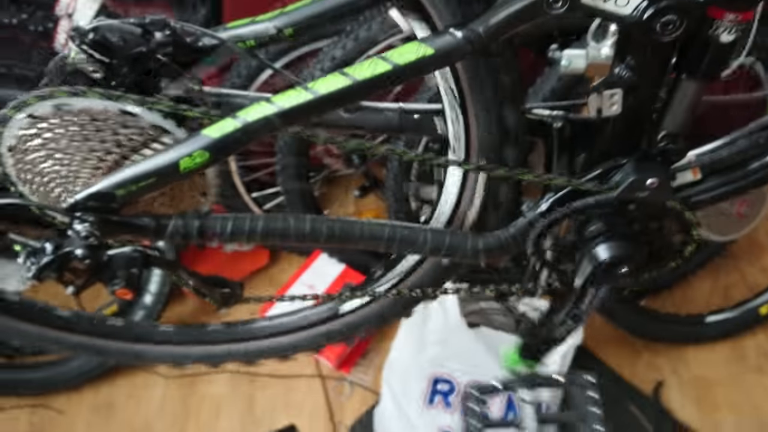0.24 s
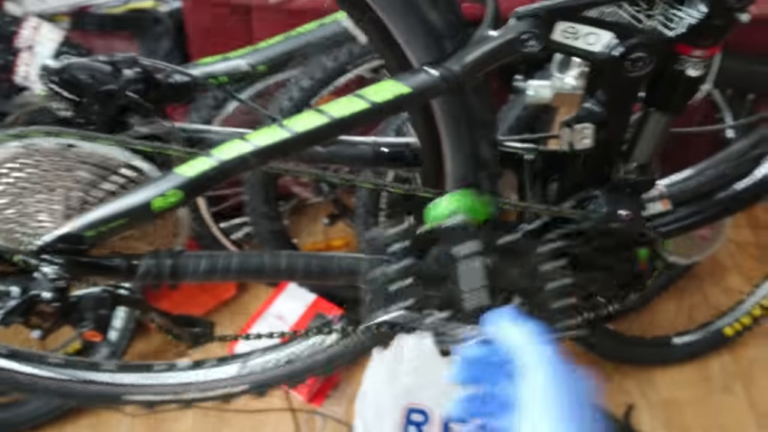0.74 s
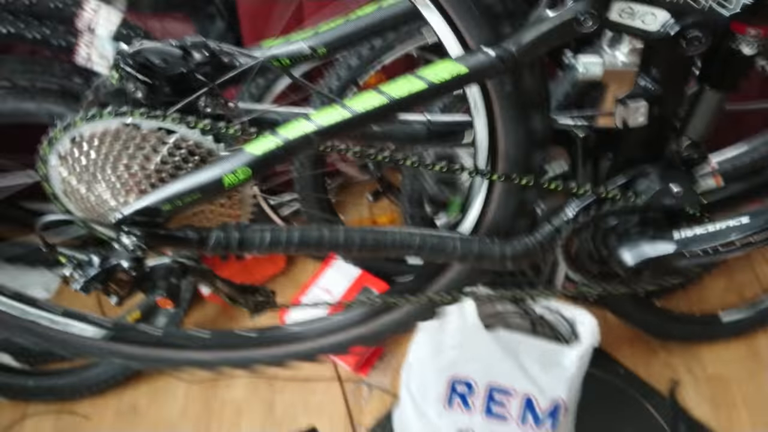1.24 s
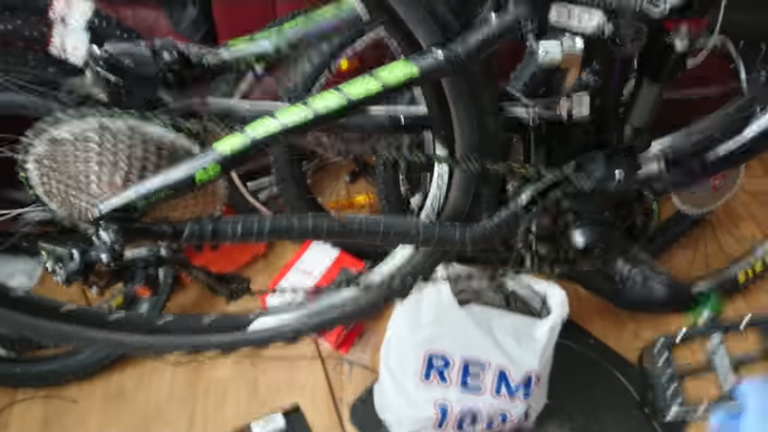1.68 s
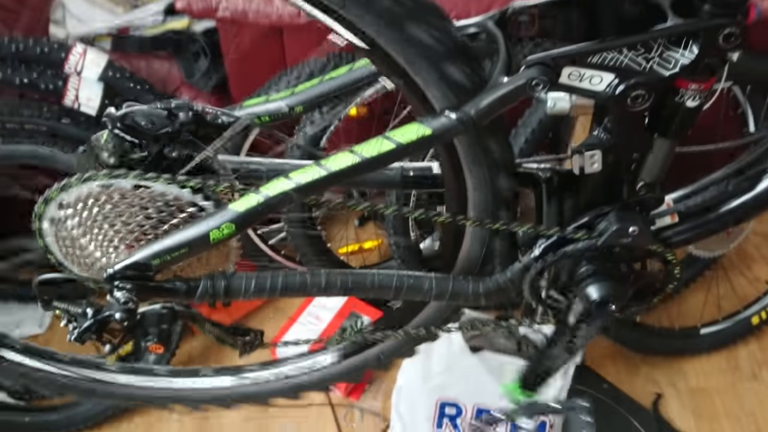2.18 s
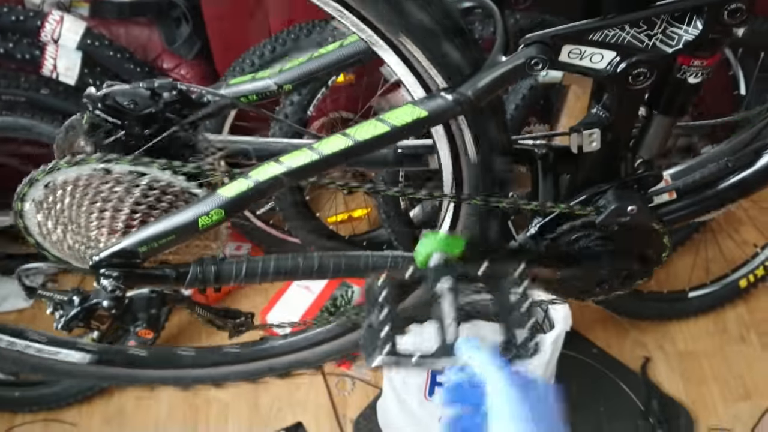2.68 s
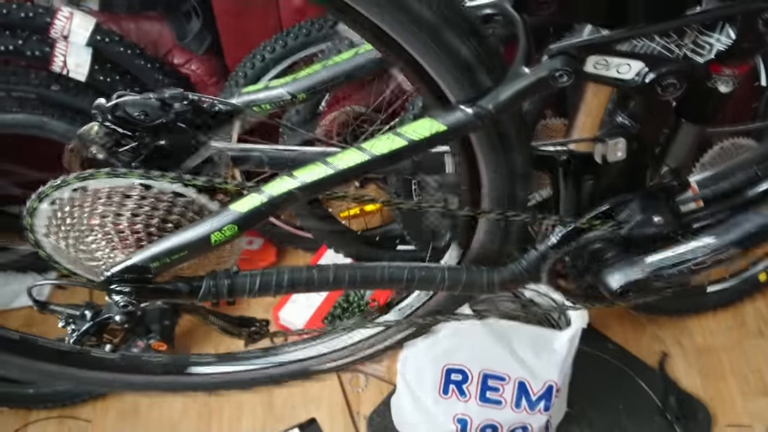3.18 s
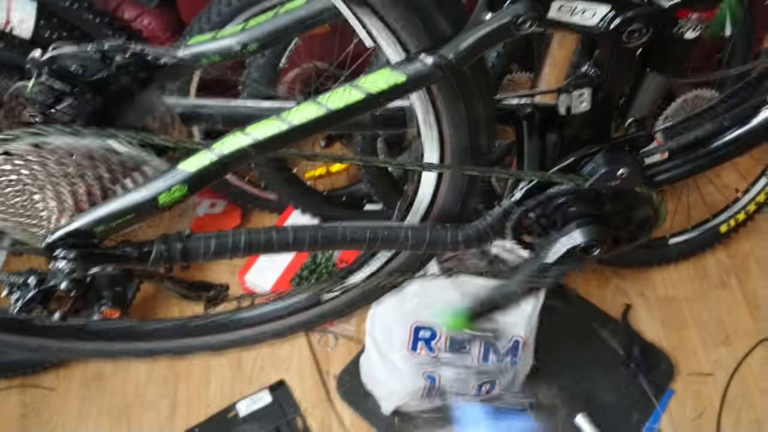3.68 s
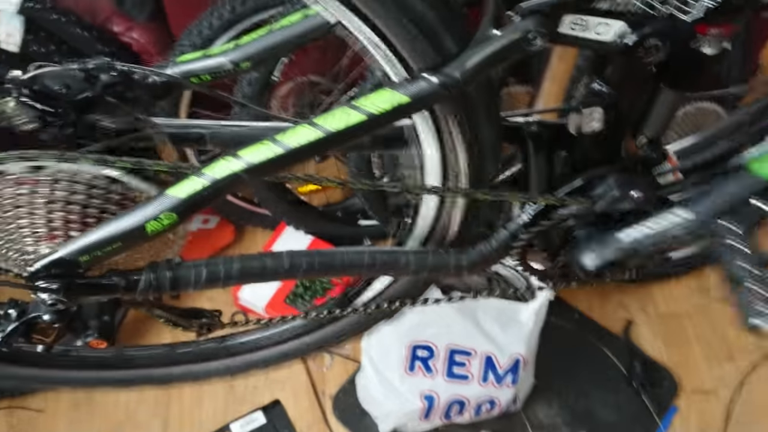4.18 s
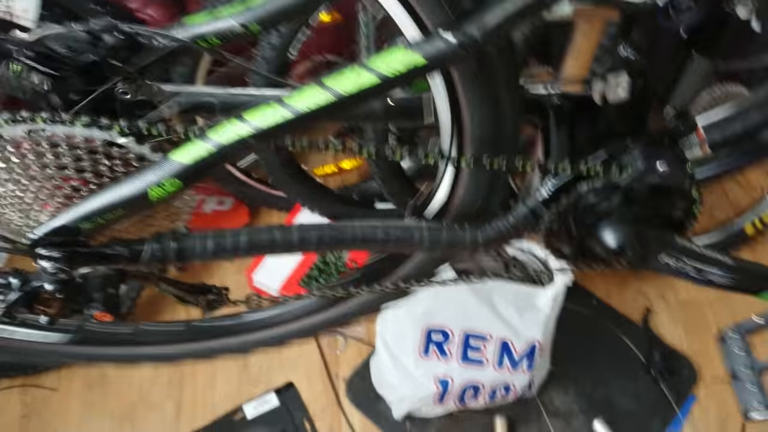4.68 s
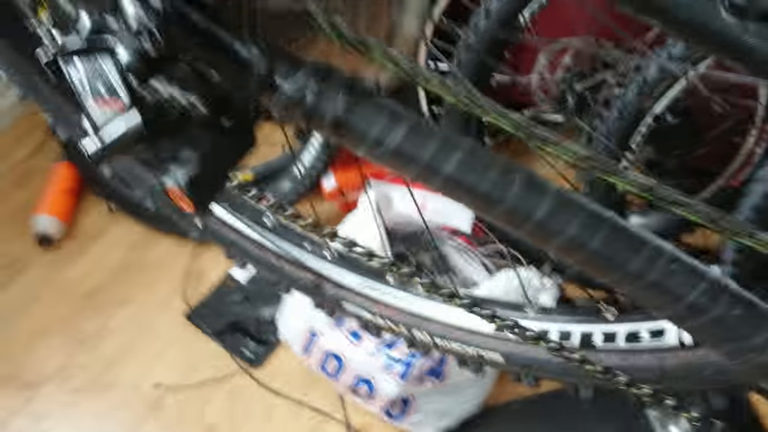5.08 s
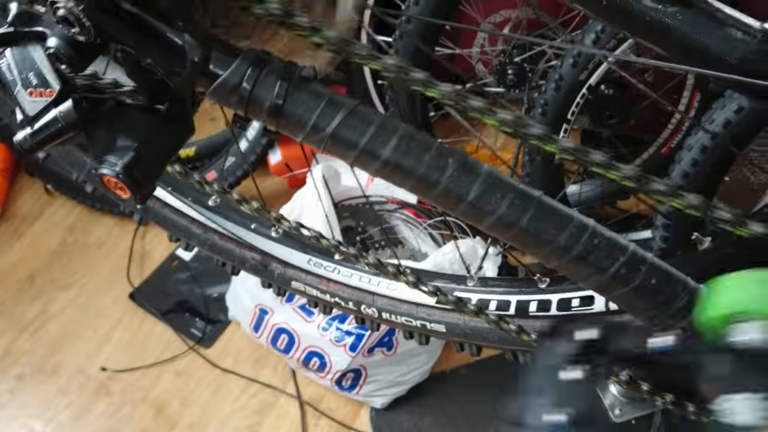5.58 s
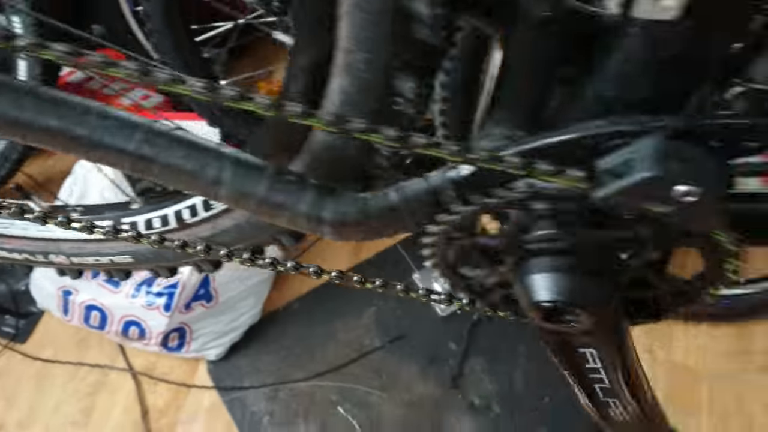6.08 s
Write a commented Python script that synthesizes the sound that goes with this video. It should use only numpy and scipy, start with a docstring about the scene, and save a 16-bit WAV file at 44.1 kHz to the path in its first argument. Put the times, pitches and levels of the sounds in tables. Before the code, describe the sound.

Hand-turned bicycle pedals drive a crunching chain, followed by slow freewheel clicks and the fast metallic buzz of a spinning wheel.

```python
"""A dry bicycle chain, cranked by hand in a small workshop, ticks and grinds over the cassette,
faster and faster. The crank stops and the freewheel ratchets slowly; the sound drops out briefly
with a click. Then the wheel is spun hard and, heard from closer, the pawl drops merge into a rasping
buzz that rings the hub. The frame rumbles and knocks under it, over faint room noise."""
import sys
import numpy as np
from scipy import signal
from scipy.fft import rfft, irfft
from scipy.io import wavfile

SR = 44100
rng = np.random.default_rng(int(sys.argv[2]) if len(sys.argv) > 2 else 0)


def to_wav(sig):
    """Store sig (one row per channel, or 1-D mono) as 16-bit WAV at the path in sys.argv[1].

    Samples outside -1..1 are clipped; the rate is SR.
    """
    pcm = np.clip(np.atleast_2d(sig), -1, 1) * 32767
    pcm = np.round(pcm).astype(np.int16)
    wavfile.write(sys.argv[1], SR, pcm.T)  # frames by channels


N = 279594
TIME = np.arange(N) / SR
CRANK_STOP_S = 3.99
EASY_LINK_HZ, FAST_TOOTH_HZ = 20, 100  # reference rates; each rise_db is per doubling of rate

# hand-cranked chain speed: time_s, link_rate_hz
CHAIN_SPEED = [(0.0538, 14.91), (0.17, 14.3), (0.29, 18.77), (0.53, 24.38), (0.65, 18.95), (0.77, 19.38),
               (0.9, 17.73), (1.02, 19.38), (1.62, 17.1), (1.74, 13.31), (1.98, 12.83), (2.34, 17.96),
               (2.46, 18.68), (2.58, 15.43), (3.06, 20.29), (3.3, 25.88), (3.54, 38.31), (3.9, 45.3),
               (4.02, 29.35)]
# spinning freewheel speed: time_s, tooth_rate_hz
SPIN_SPEED = [(4.911, 18.65), (4.97, 56.44), (5.05, 84.99), (5.12, 115.68), (5.2, 157.17), (5.28, 159.44),
              (5.35, 160.02), (5.41, 137.95), (5.5, 136.56), (5.62, 128.58), (5.76, 127.63), (5.87, 109.01),
              (5.97, 106.27), (6.07, 97.84), (6.16, 102.26), (6.25, 95.95), (6.34, 109.7)]


def chain():
    """Links hit the teeth, ring plates, clunk against the chain stay, and rattle over the derailleur pulleys."""
    # chain spectrum: freq_hz, left_db, right_db
    spectrum = [(300.0, -26, -10.5), (1250, -14.5, -18), (2100, -9.5, -13.5), (2910, -9, -10.5),
                (4320, -2, -8.5), (5030, -4, -8.5), (7280, -12, -28), (7830, -21.5, -23.5),
                (9370, -15, -5.5), (10570, -16.5, -16), (11540, -50, -24), (13100, -21, -17.5),
                (13700, -15, -22), (15300, -19.5, -15)]
    contacts = [(-.002, -14, .0013), (.0009, -1, .00052)]  # delay_s, level_db, decay_s
    start_s, level_db, crack_db = links()
    plates = band(strokes(start_s, undb(level_db + 14.5), contacts), 3755, 4840)
    stay_clunk = band(strokes(start_s, undb(level_db + 13.5), contacts), 2200, 2210)
    cracks = impacts(start_s, undb(level_db + crack_db), contacts, scatter_db=5, jitter_s=.0001)
    rattle_s = start_s + .009 * rng.standard_normal(len(start_s))
    rattles = impacts(rattle_s, undb(level_db - 7), contacts, scatter_db=2.1, jitter_s=.00039)
    sound = colour(cracks + plates + stay_clunk + lowpass(rattles, 7500) + rollers(), spectrum)
    return workshop(sound, early_db=-5, early_t60_s=.059, late_db=-5.5, late_t60_s=.21)


def links(rise_db=7.5, scatter_db=2.5):
    """One tick per link, harder at speed; stiff links snap. Returns start_s, level_db, crack_db."""
    # stiff links catching and snapping free: start_s, level_db, crack_over_level_db
    snaps = [(0.272, -40.5, 12), (0.4045, -32.5, 6.5), (0.496, -27.5, 1), (0.5744, -33, 9), (.6769, -35, 2),
             (.8917, -35.5, -1), (0.922, -41, 14), (0.997, -25, 0.5), (1.1336, -35, 10.5),
             (1.3187, -36.5, 5.5), (1.6584, -41.5, 12.5), (1.6876, -35.5, 14.5), (1.956, -39, 3.5),
             (2.1024, -37, 5), (2.458, -38, 13), (2.974, -33.5, 2), (3.028, -34, 6.5), (3.123, -38, 11),
             (3.4887, -26, 4.5), (3.693, -26.5, 8), (3.7172, -28.5, 5), (3.7413, -25.5, 2),
             (3.901, -24, -3), (4.0055, -22.5, 4)]
    start_s, rate_hz = passing(CHAIN_SPEED)
    chance = rng.standard_normal((len(start_s), 2))
    level_db = -40 + rise_db * np.log2(rate_hz / EASY_LINK_HZ) + scatter_db * chance[:, 0]
    crack_db = 5.5 + 2 * chance[:, 1]
    ticks = np.column_stack([start_s, level_db, crack_db])
    supple = np.abs(start_s[:, None] - np.array(snaps)[:, 0]).min(1) > .01
    return np.vstack([ticks[supple], snaps]).T


def rollers(grain_rate_hz=4000):
    """Dry rollers crunch, louder and brighter with speed and effort; they fade as the crank stops."""
    grains = rng.standard_normal((2, N)) * (rng.random(N) < grain_rate_hz / SR)
    grains *= undb(2.7 * np.minimum(rng.exponential(size=N), 4))
    drive_db = cranking_db(rise_db=8.5)
    dull = lowpass(grains, 10000)
    grind = unit(dull + (grains - dull) * undb(.52 * drive_db - 2.5))
    turning = np.interp(TIME, [CRANK_STOP_S - .05, CRANK_STOP_S + .51], [1, 0])
    return grind * undb(-62 + drive_db) * turning


def cranking_db(rise_db):
    """Level change of drive noise with chain speed and hand effort."""
    # push of the hand on the pedal: time_s, effort_db
    effort = [(0, 1.5), (.25, -3.5), (.5, 2.5), (.8, -.5), (1.2, 1.5), (2.0, -4), (2.42, -2.5), (2.8, -2),
              (3.7, 1.5), (4.02, 4)]
    return rise_db * np.log2(curve(CHAIN_SPEED) / EASY_LINK_HZ) + curve(effort)


def spinning(rise_db=3):
    """Freewheel spun up: pawl drops grow harder, merge into a buzz and ring hub and pawls."""
    # buzz spectrum: freq_hz, left_db, right_db
    spectrum = [(145, -43, -42.5), (1220, -31.5, -31), (1740, -24, -22), (2010, -21, -13.5),
                (2320, -32, -18), (2760, -12.5, -4.5), (3720, -12, -12), (4300, -12, -8),
                (6750, -15, -17.5), (7680, -19, -27), (9130, -21, -10), (11900, -25.5, -29.5),
                (13300, -23.5, -17.5), (15400, -9.5, -17)]
    # pawl contacts: delay_s, level_db, decay_s
    pawls = [(-.0015, -9, .00029), (-.0006, -6, .00023), (.0002, -9.5, .0008)]
    start_s, rate_hz = passing(SPIN_SPEED)
    chance = rng.standard_normal((len(start_s), 2))
    start_s = start_s + .00004 * chance[:, 1]
    gains = undb(1.48 + rise_db * np.log2(rate_hz / FAST_TOOTH_HZ) + .83 * chance[:, 0])
    drops = impacts(start_s, gains, pawls, scatter_db=.5, jitter_s=.00015)
    push = band(strokes(start_s, gains, pawls), 590, 3860)  # gives the buzz its pitch
    rasp = colour(drops - .37 * lowpass(drops, 1650) + undb(-3.5) * push, spectrum)
    doublings = np.log2(curve(SPIN_SPEED) / FAST_TOOTH_HZ)
    hub_db = -12.5 + doublings + wander(12)
    hub_ring = hub(drops * undb(hub_db)) * undb([[-7], [3]])
    pawl_db = -4.6 + 2.5 * doublings + wander(25)
    pawl_ring = band(drops * undb(pawl_db), 4300, 5060) * undb([[-5], [3]])
    sound = rasp + hub_ring + pawl_ring + zings(start_s) * undb([[-4], [2.5]])
    return workshop(sound, early_db=-3, early_t60_s=.046, late_db=-2, late_t60_s=.43)


def hub(drive):
    """Hub shell and cassette ring; each mode has its own phase per channel."""
    # hub and cassette modes: freq_hz, level_db, t60_s
    modes = [(2490, -7, 0.046), (2740, 5, 0.15), (2934, -2, 0.015), (2860, -14, 0.027), (3030, 0, 0.04),
             (3186, -1.5, 0.063), (3680, -12, 0.085), (3920, -11, 0.054), (4500, -21, 0.067),
             (5700, -31, .05), (5880, -14, 0.028)]
    t = np.arange(SR // 5) / SR
    response = 0
    for hz, db, t60_s in modes:
        tone = np.sin(2 * np.pi * (hz * t + rng.random((2, 1))))
        response += undb(db) / np.sqrt(t60_s) * decay(t, t60_s) * tone
    return convolve(drive, unit(response) / np.sqrt(len(t)))


def zings(tooth_s, ring_s=.00037, sag_hz_per_s=11000, size=256):
    """Pawls bite harder for a few teeth: a run of pings swells, fades and sags in pitch."""
    # hard bites: centre_s, level_db, half_length_s, pitch_hz
    bites = [(5.035, -8.5, .005, 5150), (5.172, -13.5, 0.018, 3050), (5.806, -10, .02, 5170)]
    out, age_s = np.zeros((2, N + size)), np.arange(size) / SR
    ping = age_s / ring_s * np.exp(1 - age_s / ring_s)
    for centre_s, db, half_s, hz in bites:
        for offset_s in tooth_s[np.abs(tooth_s - centre_s) < 2 * half_s] - centre_s:
            cycles = (hz - sag_hz_per_s * offset_s) * age_s + .2 * rng.random((2, 1))
            gain = undb(db) * np.exp(-(offset_s / half_s) ** 2)
            i = int((centre_s + offset_s) * SR)
            out[:, i:i + size] += gain * ping * np.sin(2 * np.pi * cycles)
    return out[:, :N]


def coasting():
    """Slow ratchet: at each tooth three pawls drop within a few milliseconds."""
    # coasting freewheel speed: time_s, tooth_rate_hz
    speed = [(4.0524, 15.13), (4.13, 22.45), (4.45, 24.92), (4.52, 22.53), (4.76, 24.68)]
    # ratchet spectrum: freq_hz, left_db, right_db
    spectrum = [(149, -34, -29), (1160, -22.5, -20), (1970, -11.5, -13), (2340, -16.5, -16),
                (2920, -1.5, -4), (3740, -3, -7), (4450, 0, -2.5), (5850, -3.5, -9), (6870, 1.5, -13),
                (8100, -15, -12.5), (9340, -6, -3.5), (11700, -18, -13), (14300, -5.5, -9), (15000, -5, -8)]
    # pawl contacts: delay_s, level_db, decay_s
    pawls = [(-.0005, -8, .0021), (.0012, -2.5, .00033), (.002, -4, .0008)]
    start_s, _ = passing(speed)
    gains = undb(-5 + .2 * rng.standard_normal(len(start_s)))
    drops = colour(impacts(start_s, gains, pawls, scatter_db=1, jitter_s=.00018), spectrum)
    return workshop(drops, early_db=-9, early_t60_s=.11, late_db=.5, late_t60_s=.27)


def frame(rundown_db_per_s=25):
    """Drive rumble in the frame, frame and pedal knocks, and one short click as the sound drops out."""
    # frame rumble spectrum: freq_hz, left_db, right_db
    spectrum = [(98, -17.5, -16.5), (285, -13, -7.5), (373, -2, -3), (475, -3, 3.5), (600, -21.5, -5),
                (630, 0, 6.5), (788, -18, -7.5), (1180, -21, -12.5), (2510, -33, -47)]
    # frame and pedal knocks, and one short click at the dropout: start_s, level_db, pitch_hz, t60_s
    knocks_and_click = [(.28, -52, 123, 0.35), (.29, -50, 412, .2), (0.52, -42.5, 131, .084),
                        (.522, -44, 332, 0.14), (.575, -46.5, 431, 0.68), (.636, -45.5, 53.5, .4),
                        (0.746, -53, 62, 0.18), (1.359, -41.5, 134, 0.13), (1.44, -54, 433, .22),
                        (1.495, -48, 188, 0.32), (2.5, -55, 390, 0.43), (2.556, -49.5, 52.6, 0.42),
                        (3.4, -47, 149, 0.085), (4.747, -35, 810, 0.022), (5.004, -48, 115, 0.27),
                        (5.82, -44.5, 221, 0.15), (6.045, -44.5, 622, 0.45), (6.255, -41, 640, 0.18),
                        (6.258, -53, 191, 0.46)]
    noise = .82 * rng.standard_normal((2, N)) + stereo_lag(rng.standard_normal(N))
    rundown_db = rundown_db_per_s * np.maximum(TIME - CRANK_STOP_S, 0)
    out = unit(colour(noise, spectrum)) * undb(-64.5 + cranking_db(rise_db=6.5) - rundown_db)
    for start_s, db, hz, t60_s in knocks_and_click:
        age_s = np.maximum(TIME - start_s, 0)
        tone = np.sin(2 * np.pi * hz * age_s)
        burst = unit(band(rng.standard_normal(N), hz * .62, hz * 1.5))
        envelope = (1 - np.exp(-age_s / .00089)) * decay(age_s, t60_s)
        out += undb(db) * undb([[-5], [1.5]]) * (.6 * tone + .54 * burst) * envelope
    return out


def wheel():
    """The spinning wheel shakes the frame: a low rumble that grows with speed."""
    # frame and stand resonances: low_hz, high_hz, level_db
    resonances = [(57, 106, -66), (188, 287, -58.5), (573, 890, -54.5)]
    speed = curve(SPIN_SPEED) / np.array(SPIN_SPEED)[:, 1].max() * (TIME > SPIN_SPEED[0][0])
    shake = stereo_lag(rng.standard_normal(N)) + .49 * rng.standard_normal((2, N))
    rumble = sum(unit(band(shake, low_hz, high_hz)) * undb(db) for low_hz, high_hz, db in resonances)
    return speed * rumble * undb([[-3], [1.5]])


def workshop(x, early_db, early_t60_s, late_db, late_t60_s, shift_hz=1.7):
    """Reflections off floor and bicycles, then a short tail; turning spokes shift the echoes."""
    t = np.arange(SR // 2) / SR
    angle = 2 * np.pi * shift_hz * TIME
    out = x
    for weight in (np.cos(angle), np.sin(angle)):
        response = 0
        for db, t60_s in ((early_db, early_t60_s), (late_db, late_t60_s)):
            tail = rng.standard_normal((2, len(t))) * decay(t, t60_s) * (t > .0025)
            response += undb(db) * unit(tail) / np.sqrt(len(t))
        out = out + convolve(x * weight, response)
    return out


def background():
    """Faint low room noise."""
    # room noise spectrum: freq_hz, left_db, right_db
    spectrum = [(20.2, -16, -38), (41.3, -22, -11), (60.7, -21, 5), (88, -16.5, -5), (121, -24, 1),
                (200, -22, -13.5), (495, -20, -12), (950, -18.5, -8), (2610, -10.5, -16.5),
                (6240, -37, -52), (15000, -56, -49)]
    noise = rng.standard_normal((2, N)) + rng.standard_normal(N)
    return unit(colour(noise, spectrum)) * undb(-66.5)


def dropout(start_s=4.747, fall_s=.026, return_s=.126, depth_db=-51):
    """Gain of the brief gap before the wheel is spun."""
    corners_s = start_s + np.cumsum([0, fall_s, return_s])
    return undb(np.interp(TIME, corners_s, [0, depth_db, 0]))


def impacts(times_s, gains, contacts, scatter_db, jitter_s, size=512):
    """Each blow is a few gritty metal contacts; the grit differs left and right."""
    out, t = np.zeros((2, N + 2 * size)), np.arange(size) / SR
    delay_s, db, decay_s = np.array(contacts, float).T[:, :, None]
    for start_s, gain in zip(times_s, gains):
        age_s = t - np.abs(delay_s - delay_s.min() + jitter_s * rng.standard_normal(delay_s.shape))
        strength = undb(db + scatter_db * rng.standard_normal(db.shape))
        envelopes = strength * (age_s >= 0) * np.exp(-np.abs(age_s) / decay_s)
        grit = rng.standard_normal((2, size)) + .38 * rng.standard_normal(size)
        i = int(np.clip((start_s + delay_s.min()) * SR, 0, N))
        out[:, i:i + size] += gain * unit(envelopes.sum(0) * grit) / np.sqrt(size)
    return out[:, :N]


def strokes(times_s, gains, contacts):
    """Repeatable push of each blow: one clean pulse per contact."""
    out = np.zeros(N + 2)
    for delay_s, db, _ in contacts:
        place = np.clip((times_s + delay_s) * SR, 0, N)
        i = place.astype(int)
        np.add.at(out, i, gains * undb(db) * (1 - place + i))
        np.add.at(out, i + 1, gains * undb(db) * (place - i))
    return stereo_lag(out[:N])


def passing(speed):
    """Time and rate of each tooth or link passing along a speed table."""
    rate_hz = curve(speed)
    running = (TIME >= speed[0][0]) & (TIME <= speed[-1][0])
    count = np.ceil(np.cumsum(rate_hz * running) / SR)
    at = np.flatnonzero(np.diff(count))
    return TIME[at], rate_hz[at]


def colour(x, spectrum, size=2048):
    """Minimum-phase stereo filter; keeps the power of white noise."""
    hz, *sides_db = np.array(spectrum, float).T
    log_hz = np.log(np.maximum(np.fft.rfftfreq(size, 1 / SR), 1))
    gains = undb([np.interp(log_hz, np.log(hz), db) for db in sides_db])
    cepstrum = irfft(np.log(gains))
    cepstrum[:, 1:size // 2] *= 2
    cepstrum[:, size // 2 + 1:] = 0
    response = irfft(np.exp(rfft(cepstrum)))
    return convolve(x, unit(response) / np.sqrt(size))


def stereo_lag(x, lag_s=.00027):
    """One wave arrives left just before right."""
    return np.array([x, np.interp(TIME - lag_s, TIME, x)])


def wander(rate_hz):
    """Random drift, spread near 1."""
    return np.interp(TIME * rate_hz, np.arange(256), rng.standard_normal(256))


def curve(table):
    """Time-value rows joined by straight lines."""
    return np.interp(TIME, *np.array(table, float).T)


def band(x, low_hz, high_hz):
    return signal.sosfilt(signal.butter(2, [low_hz, high_hz], "band", fs=SR, output="sos"), x)


def lowpass(x, hz):
    return signal.sosfilt(signal.butter(1, hz, fs=SR, output="sos"), x)


def convolve(x, response):
    return signal.fftconvolve(np.atleast_2d(x), response, axes=1)[:, :N]


def decay(age_s, t60_s):
    return np.exp(-np.log(1000) * age_s / t60_s)


def unit(x):
    return x / np.sqrt(np.mean(x ** 2))


def undb(db):
    return 10 ** (np.asarray(db) / 20)


def scene():
    """Drivetrain, freewheel and room; a trace of room noise stays through the gap."""
    bicycle = chain() + frame() + coasting() + spinning() + wheel()
    gap = dropout()
    return bicycle * gap + background() * np.maximum(gap, undb(-11.5))


def record(dry, bass_hz=42, top_hz=15750):
    """Deep bass rolled off, top cut steeply."""
    thin = signal.sosfilt(signal.butter(3, bass_hz, "high", fs=SR, output="sos"), dry)
    return signal.sosfilt(signal.ellip(12, .2, 80, top_hz, fs=SR, output="sos"), thin)


dry = scene()
out = record(dry)
to_wav(out)
```